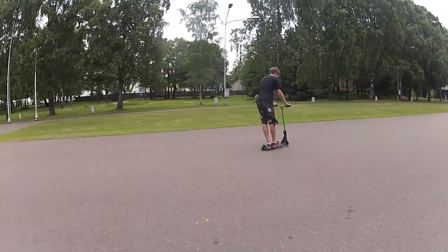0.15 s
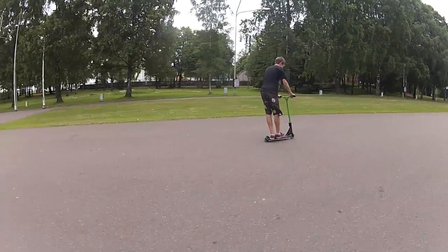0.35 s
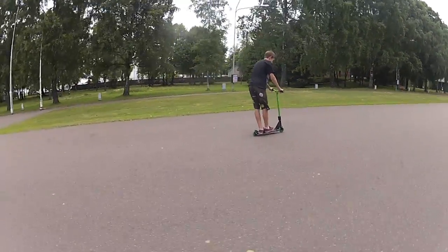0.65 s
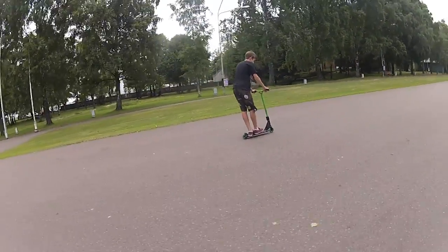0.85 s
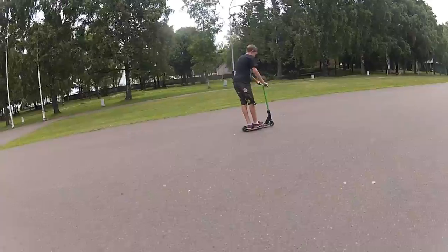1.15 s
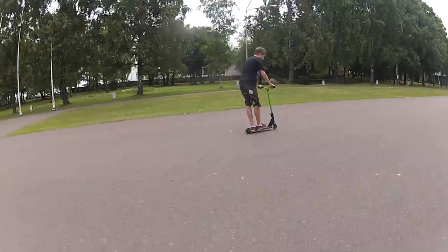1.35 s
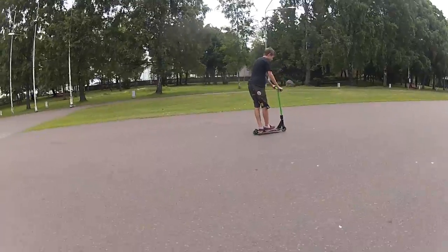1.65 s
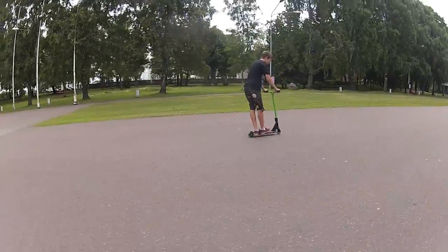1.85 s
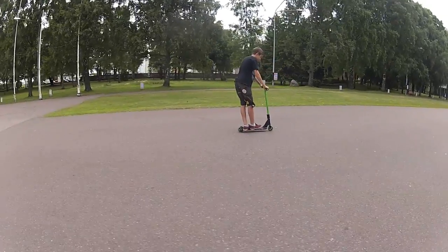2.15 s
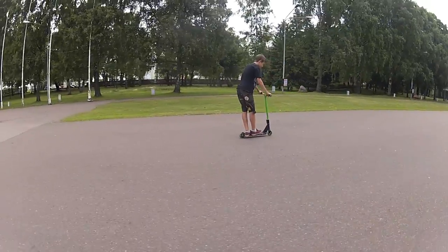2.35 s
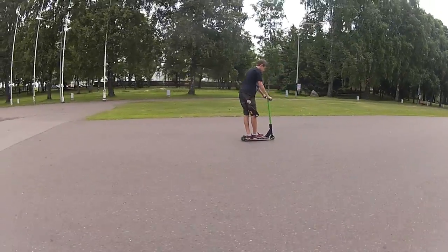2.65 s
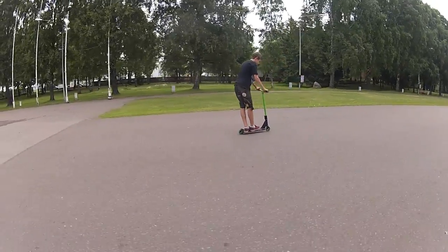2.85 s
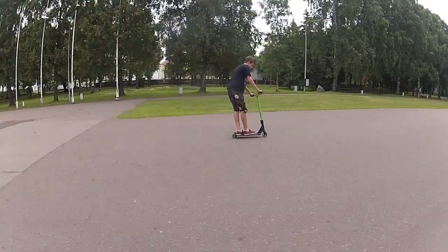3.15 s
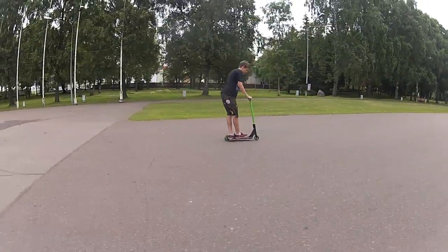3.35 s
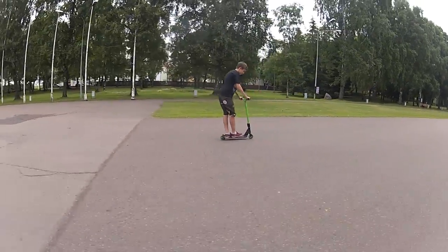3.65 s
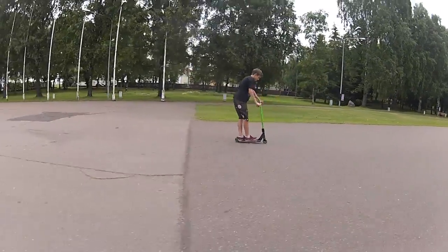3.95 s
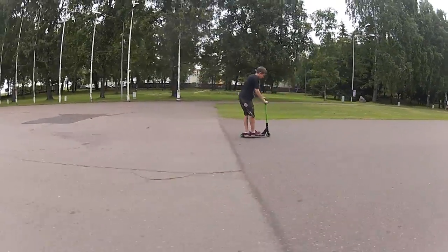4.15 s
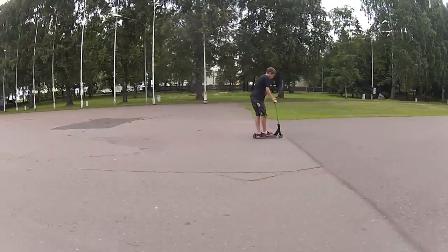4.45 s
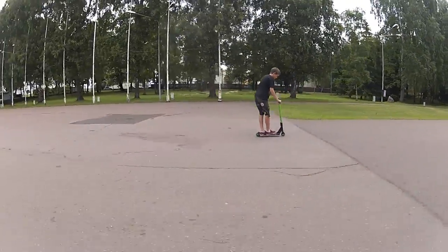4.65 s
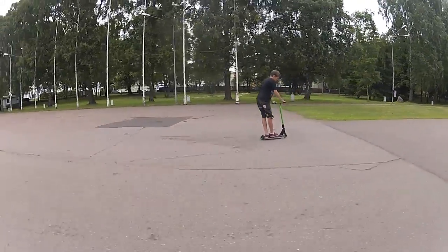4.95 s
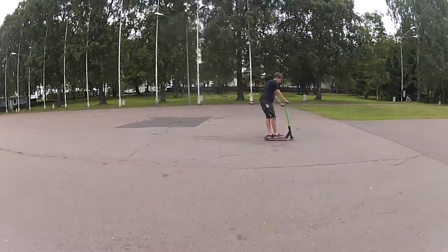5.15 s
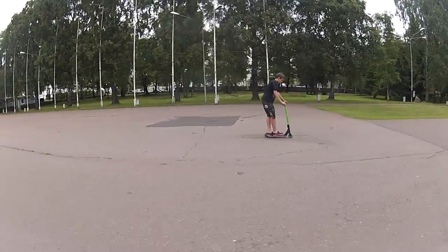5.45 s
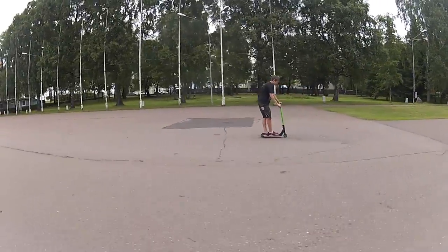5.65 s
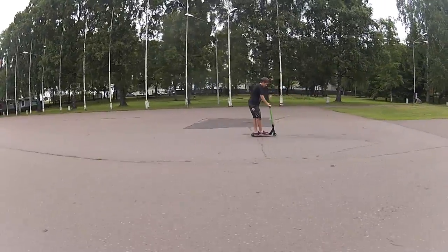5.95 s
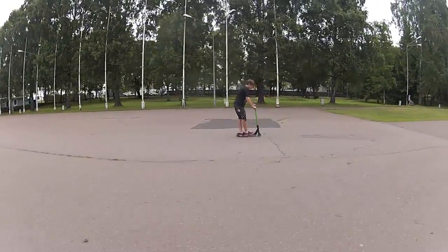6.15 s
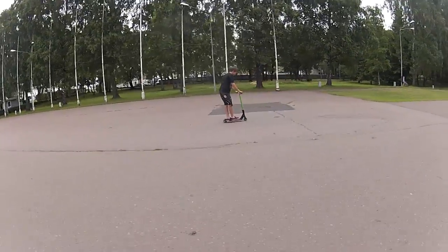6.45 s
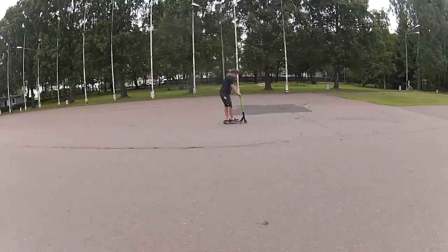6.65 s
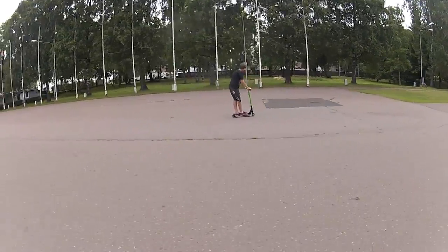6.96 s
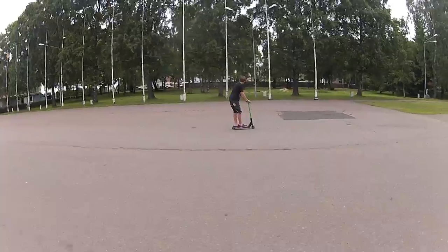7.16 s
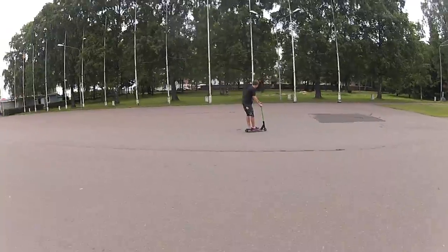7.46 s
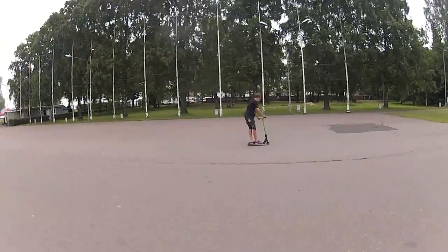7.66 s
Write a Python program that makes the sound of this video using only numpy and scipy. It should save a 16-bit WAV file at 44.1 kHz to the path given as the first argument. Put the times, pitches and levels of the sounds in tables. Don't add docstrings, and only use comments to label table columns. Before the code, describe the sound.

Throughout, small hard wheels roll over asphalt: a steady low hum, dry grit and a faintly ringing deck, with lumpy low wind rumbling on the microphone. At 0.5-0.75 s a loose clamp buzzes in short bursts over a soft brake rub, ending with a light knock. Brief thin ringing from the bar appears around 1.5 and 2.4 s. At 2.85 s the deck slams down, extremely loud and abrupt, bounces, grinds for an instant, and a wheel chatters until about 3.05 s. Plain rolling follows, with faint scattered bird chirps from 4 s. At 6.4 s a sole brushes the deck; at 6.54 s the foot lands with a heavy thump, then scuffs with a slight squeal, swelling until 7.25 s. At 7.43 s the tail clacks and drags, skidding until 7.6 s before rolling continues. Dry, open outdoors; one coarse microphone gives brittle, metallic highs.

```python
import sys
import numpy as np
from scipy import signal
from scipy.fft import rfft, irfft, next_fast_len
from scipy.io import wavfile

SR = 44100
rng = np.random.default_rng(int(sys.argv[2]) if len(sys.argv) > 2 else 0)


def inscribe(sig):
    pcm = np.round(np.clip(np.atleast_2d(sig).T, -1, 1) * 32767)
    wavfile.write(sys.argv[1], SR, pcm.astype(np.int16))


def field_ratio(decibels):
    return 10 ** (np.asarray(decibels, dtype=float) / 20)


N = 343539

# (frequency [Hz], density [dB per Hz])
WIND_SPECTRUM = [(8, -23), (16, -5), (28, -2.5), (42, 0.5), (56, 0.5), (70, -3), (92, -13.5), (160, -17.5),
                 (210, -25), (350, -90)]
HUM_SPECTRUM = [(53, -51), (90, -2), (167, -6), (241, 1), (476, -12), (550, -16.5), (700, -16.5),
                (910, -40), (1540, -120)]
GRIT_SPECTRUM = [(240, -65), (400, -4), (845, -6.5), (1150, -11.5), (1290, -15.5), (1520, -13.5),
                 (1890, -4), (2750, -17.5), (5010, -16.5), (6000, -25), (7800, -64), (13200, -120)]
# (frequency [Hz], density [dB per Hz])
HISS_SPECTRUM = [(30, 6), (250, 10), (800, -3), (2000, -7), (4500, -2.5), (6000, -13), (7500, -6),
                 (9500, -20), (16000, -23)]
# (time [s], level [dB])
GUSTS_DB = [(0.0, -45), (0.35, -46.5), (0.45, -43), (1.02, -46), (1.13, -46.5), (1.34, -47), (2.32, -47.5),
            (2.73, -44.5), (3.03, -48.5), (3.36, -46.5), (4.1, -49), (4.45, -40.5), (5.25, -45),
            (6.44, -41), (6.66, -44.5), (7.48, -44.5), (7.53, -43.5), (7.79, -44.5)]
# (time [s], level [dB])
COARSENESS_DB = [(0.0, -48), (2.23, -47), (2.73, -45), (3.08, -47), (4.9, -44.5), (5.6, -47.5), (6.33, -45),
                 (6.88, -45.5), (7.42, -45), (7.79, -48.5)]

# (frequency [Hz], width [Hz], level [dB])
DECK_PEAKS = [(663, 39, -2), (1020, 264, -4), (1142, 40, 0.5), (1865, 113, 0.5), (2137, 116, -3.5),
              (2356, 217, -2.5), (3050, 270, -14), (3240, 550, -12)]
PLATE_PEAKS = [(230, 220, -5.5), (500, 340, -15), (930, 200, 2.5), (1410, 520, -6), (1600, 160, 1),
               (1770, 130, -3), (2050, 270, 2), (2280, 120, -3), (2740, 400, -15), (3210, 200, 0.5),
               (3450, 140, -4), (3800, 220, -1.5), (4260, 790, -10.5), (5200, 1200, -21)]
TAIL_PEAKS = [(190, 150, -9.5), (330, 210, -16), (816, 95, -6.5), (1018, 60, 1), (1436, 110, -2),
              (1750, 120, -7), (1980, 140, -1.5), (2400, 220, -8.5), (2910, 850, -18.5), (3300, 270, -2),
              (3620, 270, -13), (4200, 440, -15), (5100, 1400, -24.5)]
RIM_PEAKS = [(915, 320, -7.5), (1350, 330, -10.5), (1830, 230, -3.5), (2230, 240, -6), (3160, 170, 0.5),
             (3480, 230, -3.5), (4050, 210, -13), (4700, 990, -19)]
WHEEL_PEAKS = [(910, 240, -3.5), (1530, 300, -12), (1930, 300, 0.5), (2270, 220, -6), (3300, 580, -6.5),
               (4200, 1100, -15)]
CLAMP_PEAKS = [(1890, 64, -0.5), (2006, 29, -3), (2165, 72, -1.5), (2300, 95, 0.5)]
PAD_PEAKS = [(1110, 710, -7), (3150, 230, 2.5), (3900, 590, -4), (4260, 400, -5.5), (4920, 310, 0)]
BAR_PEAKS = [(1903, 105, 3), (1970, 250, -6), (2980, 270, -13)]
SHOE_PEAKS = [(930, 330, -3.5), (1230, 200, 4), (1890, 460, 0), (2400, 210, 2.5), (3020, 200, -5.5),
              (3700, 470, -12.5)]
SQUEAL_PEAKS = [(4880, 490, 0)]
SOLE_PEAKS = [(1170, 370, -5), (1760, 130, -2), (2340, 220, 2), (3420, 470, -6), (3720, 250, -5.5),
              (4900, 1300, -17)]

# (time [s], level [dB], rise [s], hold [s], fall [s])
GRAVEL_STROKES = [
    (2.86, -50.5, 0.2, .01, .15),
    (6.43, -52, 0.28, 0.043, .15),
    (7.13, -50.5, 0.078, 0.23, 0.071),
    (7.55, -50, 0.072, 0.038, 0.23),
]
GRIND_STROKES = [
    (2.8525, -11.5, .0004, .001, 0.024),
    (2.865, -20, .003, 0.014, .021),
    (2.89, -35, .01, 0.011, .005),
]
DRAG_STROKES = [
    (7.427, -15.5, 0.0076, 0.019, 0.012),
    (7.452, -29, .01, 0.0096, .005),
]
SKID_STROKES = [
    (7.495, -32, .007, .01, .02),
    (7.506, -27.5, 0.015, 0.028, .04),
    (7.568, -32.5, .035, 0.0049, 0.016),
    (7.585, -50, .02, 0.013, .012),
]
CHATTER_STROKES = [
    (2.941, -41, .065, 0.078, .022),
]
RATTLE_STROKES = [
    (0.475, -36.5, 0.044, 0.075, .05),
    (0.586, -32.5, 0.048, 0.0065, .03),
    (0.63, -38.5, .03, 0.067, .025),
    (0.662, -33.5, 0.056, 0.0073, .03),
    (.72, -47, .03, .025, .03),
]
RUB_STROKES = [
    (0.475, -46, 0.052, 0.084, 0.14),
    (0.65, -47.5, 0.22, 0.043, 0.035),
]
SING_STROKES = [
    (0.004, -45.5, 0.013, .003, .1),
    (0.132, -42.5, 0.12, .003, .025),
    (1.544, -42.5, 0.02, .003, 0.18),
    (2.33, -48.5, .04, .05, .05),
    (2.422, -44, 0.15, .003, 0.09),
    (2.51, -47.5, .3, .003, .05),
    (2.79, -45, .055, .003, 0.047),
]
SCUFF_STROKES = [
    (6.544, -36, 0.029, 0.0029, 0.11),
    (6.91, -33.5, 0.13, 0.02, 0.16),
    (7.122, -34, 0.12, 0.0091, 0.12),
    (7.236, -29.5, 0.14, 0.0023, 0.02),
]
SQUEAK_STROKES = [
    (6.55, -49, .02, 0.017, .08),
    (6.9, -46, 0.11, 0.045, 0.16),
    (7.1, -48.5, 0.057, .03, .1),
    (7.21, -47, .03, .03, .03),
]
BRUSH_STROKES = [
    (6.393, -59, .006, .035, .02),
    (6.44, -41, 0.015, 0.044, 0.032),
    (7.262, -40.5, .012, 0.028, .02),
    (7.34, -64, .15, .02, .015),
]

# (time [s], peak [dB])
CLACK_BLOWS = [
    (0.755, -34),
    (2.81, -38),
    (2.852, 0),
    (2.864, -11),
    (6.54, -27),
    (7.427, -12.5),
]
# (frequency [Hz], level [dB], t60 [s])
DECK_MODES = [(905, -22, 0.04), (968, -2.5, 0.023), (1860, -3.5, 0.027), (1890, -2.5, 0.022),
              (2450, -25, 0.051), (3300, -4, 0.064), (4300, -34, 0.02)]
# (time of zero crossing [s], level [dB], swing [Hz], negative crosses downward, rise [s], fall
# [s])
PUSHES = [(2.7242, -19, -130, .0019, .0007), (2.8522, -3.5, -150, .00005, 0.0029),
          (2.854, -12.5, 46, .0005, 0.02), (6.27, -27, -47, .018, .024), (6.5255, -21, -43, .003, .013),
          (6.5427, 2, -100, 0.0017, 0.0015), (6.548, -18, 150, .0005, 0.0054),
          (6.5423, -20, 1250, 0.00059, 0.0025), (6.541, -32, 4950, .0012, 0.0033),
          (7.234, -19.5, -120, .002, 0.005), (7.433, -29, 41.5, .008, .05)]
# (time [s], level [dB], start [Hz], end [Hz])
WHISTLES = [(3.97, -61, 3600, 3800), (4.12, -59, 3700, 4280), (4.465, -54.5, 3600, 3700),
            (4.54, -60, 3500, 3450), (4.67, -57, 3150, 3230), (4.788, -57, 3900, 4000),
            (4.84, -67, 3150, 3300), (5.274, -55, 3570, 3700), (5.43, -57, 3700, 4130),
            (6.28, -60, 3700, 4080), (6.73, -56, 3350, 3300), (7.716, -55, 3480, 3350)]


def rms_one(x):
    return x / np.sqrt(np.mean(x ** 2) + 1e-20)


def in_time(rows):
    time_s, level_db = np.transpose(rows)
    return np.interp(np.arange(N) / SR, time_s, level_db)


def strokes(rows):
    slope_db = 20
    out = np.zeros(N)
    for s, db, rise_s, hold_s, fall_s in rows:
        rise_s, hold_s, fall_s = np.maximum([rise_s, hold_s, fall_s], 1e-4)
        first = max(int((s - 3 * rise_s) * SR), 0)
        last = min(int((s + hold_s + 3 * fall_s) * SR), N)
        i = np.arange(first, last)
        early = np.maximum(s - i / SR, 0) / rise_s
        late = np.maximum(i / SR - s - hold_s, 0) / fall_s
        out[i] = np.maximum(out[i], field_ratio(db - slope_db * (early + late)))
    return out


def drift(rate_hz):
    r = np.exp(-80 * np.pi * rate_hz / SR)
    noise = rng.standard_normal(N // 40 + 2002)
    slow = signal.lfilter([1], [1, -2 * r, r * r], noise)[2000:]
    return np.interp(np.arange(N) / 40, np.arange(len(slow)), rms_one(slow))


def coloured(x, spectrum):
    hz, db = np.transpose(spectrum)
    size = next_fast_len(N)
    f = np.maximum(np.fft.rfftfreq(size, 1 / SR), 1)
    gain = field_ratio(np.interp(np.log(f), np.log(hz), db))
    return irfft(rfft(x, size) * gain, size)[:N]


def grains(per_s, spread_db):
    sizes = field_ratio(spread_db * np.minimum(rng.exponential(1, N), 3.5)) * rng.choice([-1, 1], N)
    return rms_one(sizes * (rng.random(N) < per_s / SR)) + 1e-18


def resonate(x, peaks, gain=1, patchy_db=0):
    out, power = 0, 0
    for k, (hz, width_hz, db) in enumerate(peaks):
        r = np.exp(-np.pi * 1.55 * width_hz / SR)
        b = (1 - r * r) / 2 * np.array([1, 0, -1])
        a = [1, -2 * r * np.cos(2 * np.pi * hz / SR), r * r]
        own = np.roll(x, 9973 * k) * gain + 1e-18
        if patchy_db:
            own = own * field_ratio(patchy_db * drift(2.2))
        out = out + field_ratio(db) * signal.lfilter(np.convolve(b, b), np.convolve(a, a), own)
        power += field_ratio(db) ** 2 * 2.4 * width_hz / SR
    return out / np.sqrt(power)


def stroked(rows, peaks, per_s, spread_db, lumps_db, lumps_hz):
    gain = strokes(rows) * field_ratio(lumps_db * drift(lumps_hz))
    return resonate(grains(per_s, spread_db), peaks, gain)


def grit():
    coarse_db = in_time(COARSENESS_DB)
    bumps = field_ratio(0.98 * drift(18.5))
    hiss = rms_one(coloured(grains(5000, 2.5) * bumps, GRIT_SPECTRUM))
    deck = rms_one(resonate(grains(3000, 2.2), DECK_PEAKS, bumps, patchy_db=0.84))
    swing_db = 0.3 * (coarse_db - coarse_db.mean())
    shake = field_ratio(-47.5 + swing_db) + strokes(GRAVEL_STROKES)
    return shake * (field_ratio(-4) * hiss + field_ratio(-3.0) * deck)


def tyre_hum():
    level_db = in_time(COARSENESS_DB) + 2.5 + 0.35 * drift(9.6)
    return rms_one(coloured(grains(4000, 2.6), HUM_SPECTRUM)) * field_ratio(level_db)


def clacks():
    blows, out = np.zeros(N) + 1e-18, 0
    for s, db in CLACK_BLOWS:
        blows[round((s + .0004) * SR)] = field_ratio(db - 7.0)
    blows = signal.lfilter([.3], [1, -.75], blows)
    for hz, db, t60_s in DECK_MODES:
        r = field_ratio(-60 / (t60_s * SR))
        w = 2 * np.pi * hz / SR
        out = out + field_ratio(db) * signal.lfilter([0, np.sin(w)], [1, -2 * r * np.cos(w), r * r], blows)
    return out


def thumps():
    out = np.zeros(N)
    for s, db, hz, rise_s, fall_s in PUSHES:
        i = np.arange(int((s - .2) * SR), int((s + .3) * SR))
        t = i / SR - s
        swell = np.exp(np.minimum(t, 0) / rise_s - np.maximum(t, 0) / fall_s)
        out[i] += field_ratio(db) * swell * np.sin(2 * np.pi * hz * t)
    return out


def deck_grind():
    return stroked(GRIND_STROKES, PLATE_PEAKS, per_s=4000, spread_db=4.0, lumps_db=-1.0, lumps_hz=60)


def tail_drag():
    return stroked(DRAG_STROKES, TAIL_PEAKS, per_s=7000, spread_db=2.0, lumps_db=0.3, lumps_hz=60)


def rebound_skid():
    return stroked(SKID_STROKES, RIM_PEAKS, per_s=7000, spread_db=2.5, lumps_db=2.0, lumps_hz=60)


def shoe_scuffs():
    body = stroked(SCUFF_STROKES, SHOE_PEAKS, per_s=5000, spread_db=1.5, lumps_db=1.0, lumps_hz=40)
    squeal = rms_one(resonate(grains(3000, 3.8), SQUEAL_PEAKS))
    return body + squeal * strokes(SQUEAK_STROKES)


def sole_brush():
    return stroked(BRUSH_STROKES, SOLE_PEAKS, per_s=2700, spread_db=0.5, lumps_db=4.0, lumps_hz=50)


def clamp_rattle():
    return stroked(RATTLE_STROKES, CLAMP_PEAKS, per_s=3700, spread_db=2.5, lumps_db=-0.5, lumps_hz=30)


def brake_rub():
    return stroked(RUB_STROKES, PAD_PEAKS, per_s=6700, spread_db=3.0, lumps_db=0.0, lumps_hz=30)


def bar_sing():
    return stroked(SING_STROKES, BAR_PEAKS, per_s=3000, spread_db=2.5, lumps_db=-1.0, lumps_hz=30)


def wheel_chatter():
    return stroked(CHATTER_STROKES, WHEEL_PEAKS, per_s=1300, spread_db=3.0, lumps_db=1.0, lumps_hz=60)


def wind():
    level_db = in_time(GUSTS_DB) + 3 + 1.6 * drift(6.0)
    return rms_one(coloured(rng.standard_normal(N), WIND_SPECTRUM)) * field_ratio(level_db)


def birds():
    chirp_s = 0.025
    out = np.zeros(N)
    for s, db, start_hz, end_hz in WHISTLES:
        i = np.arange(int((s - .07) * SR), int((s + .07) * SR))
        t = i / SR - s
        phase = np.pi * ((start_hz + end_hz) * t + (end_hz - start_hz) * t ** 2 / chirp_s)
        out[i] += field_ratio(db) * np.exp(-(1.6 * t / chirp_s) ** 2) * np.sin(phase)
    return out * field_ratio(3.6 * drift(60))


def scene():
    rolling = grit() + tyre_hum()
    impacts = clacks() + thumps()
    scrapes = deck_grind() + tail_drag() + rebound_skid()
    foot = shoe_scuffs() + sole_brush()
    loose_parts = clamp_rattle() + brake_rub() + bar_sing() + wheel_chatter()
    mono = rolling + impacts + scrapes + foot + loose_parts + wind() + birds()
    return np.array([mono, mono])


def band_limit(x):
    return signal.sosfilt(signal.butter(12, 15350, fs=SR, output="sos"), x)


def record(dry):
    slow = signal.resample_poly(dry[0], 40, 147)
    stairs = np.repeat(np.clip(slow, -1, 1), 4)
    held = signal.resample_poly(stairs, 147, 160)[:N]
    side = field_ratio(-66.5) * rms_one(coloured(rng.standard_normal(N), HISS_SPECTRUM))
    return band_limit(np.array([held + side, held - side]))


dry = scene()
out = record(dry)
inscribe(out)
```